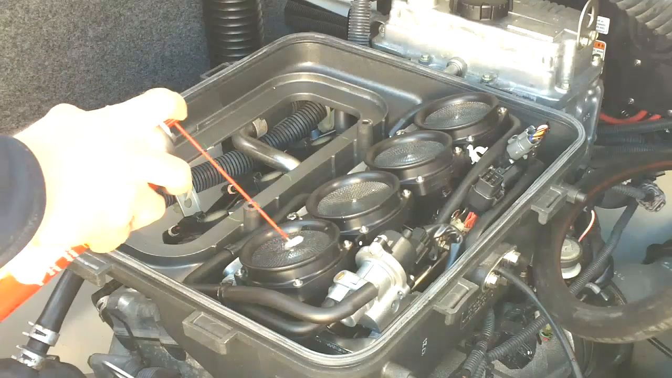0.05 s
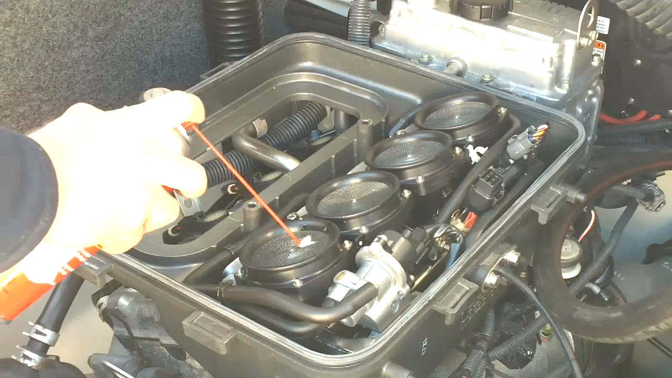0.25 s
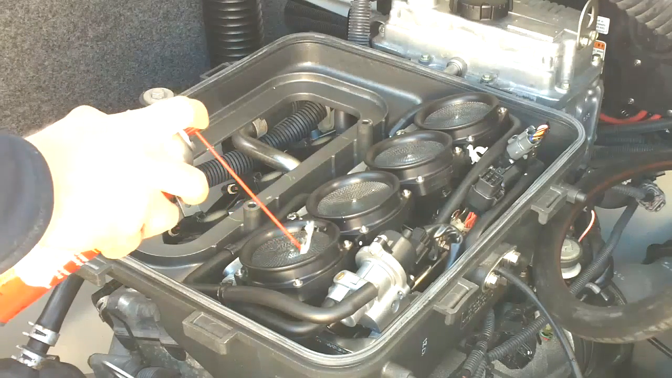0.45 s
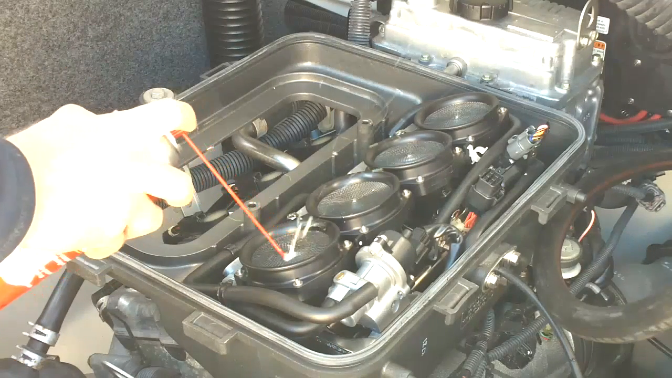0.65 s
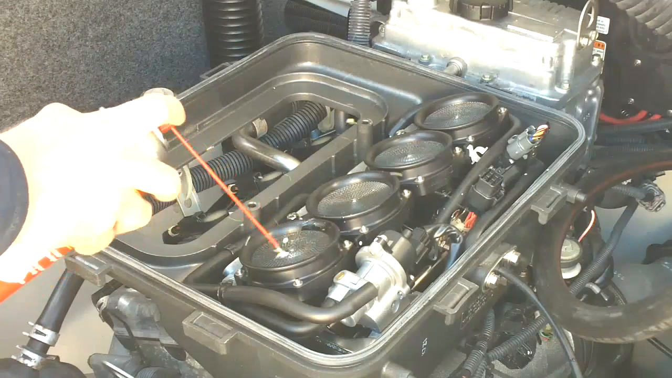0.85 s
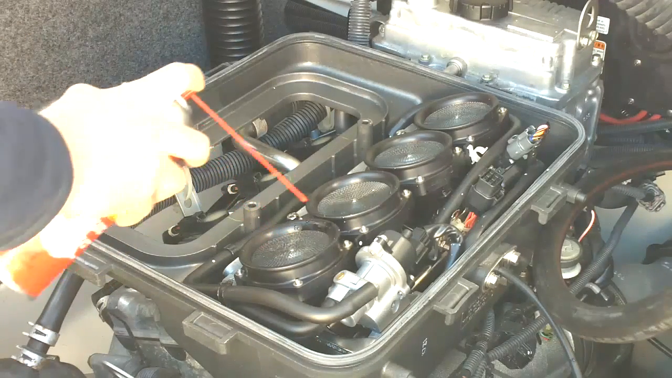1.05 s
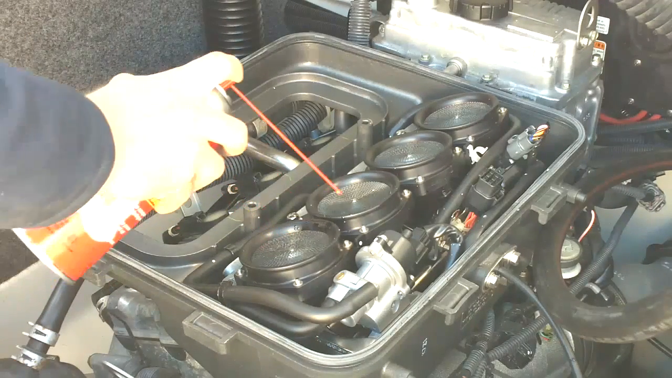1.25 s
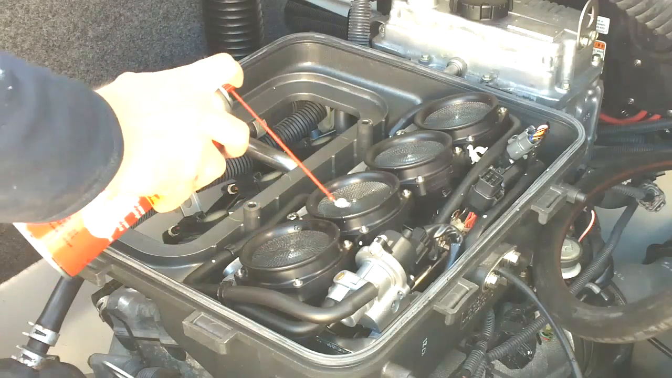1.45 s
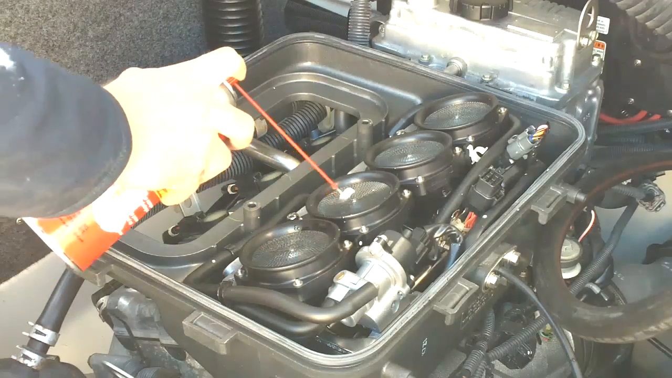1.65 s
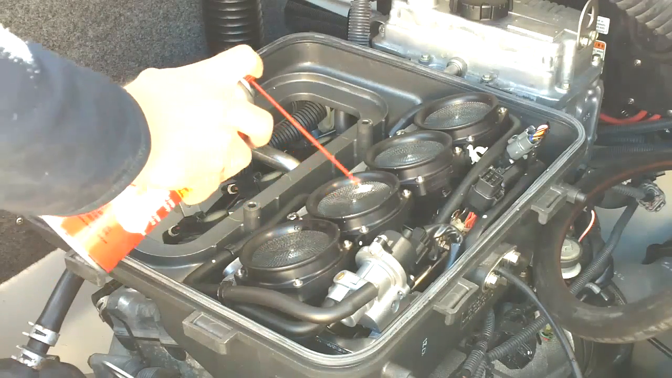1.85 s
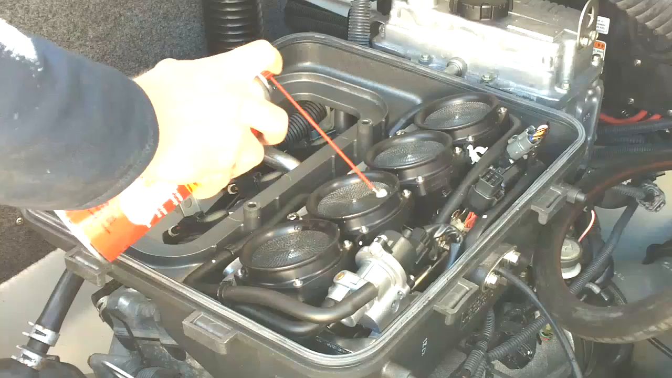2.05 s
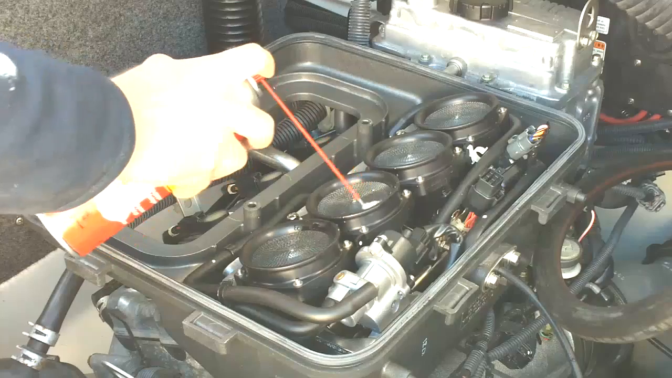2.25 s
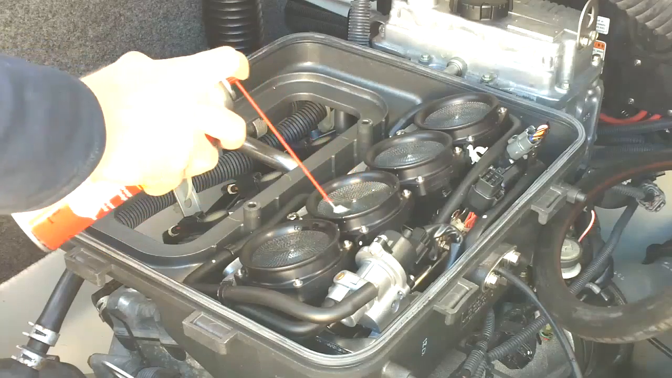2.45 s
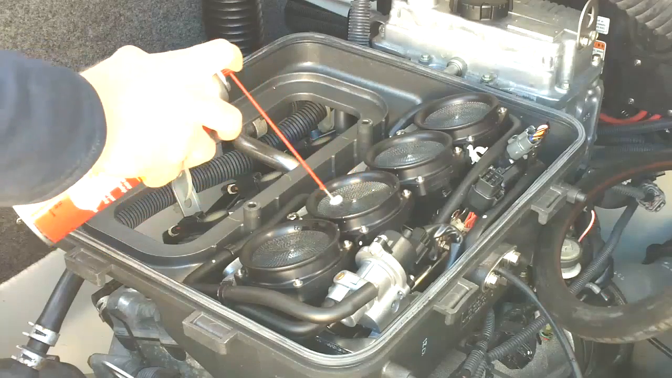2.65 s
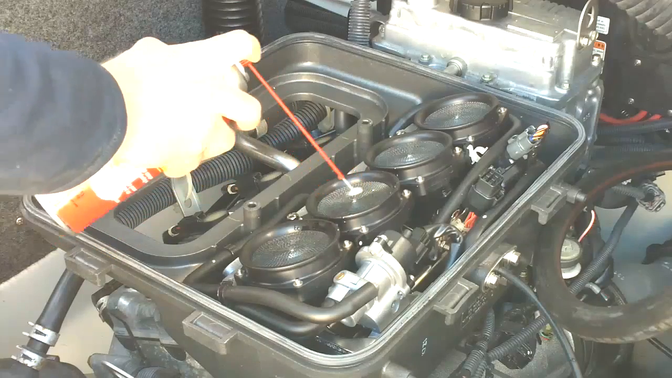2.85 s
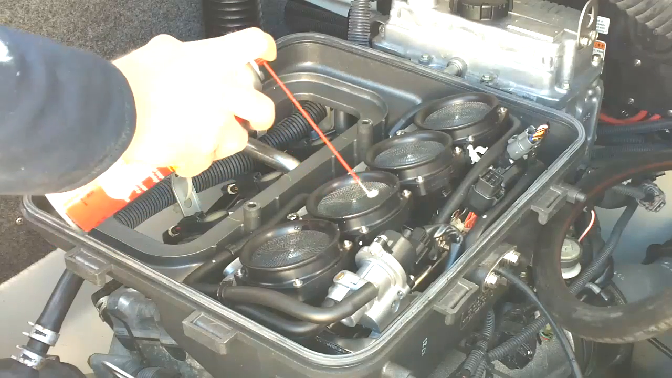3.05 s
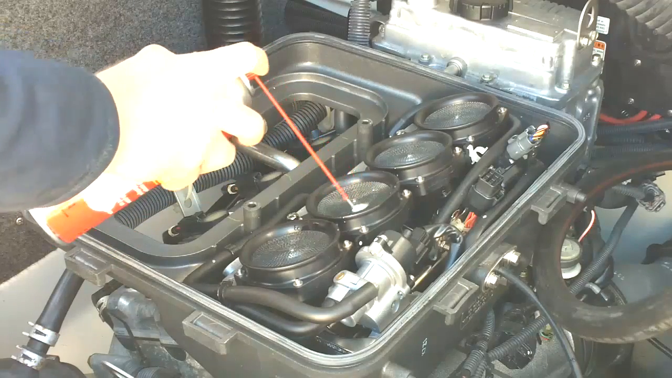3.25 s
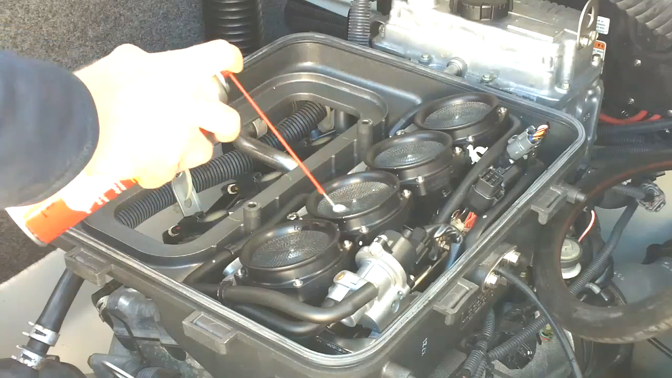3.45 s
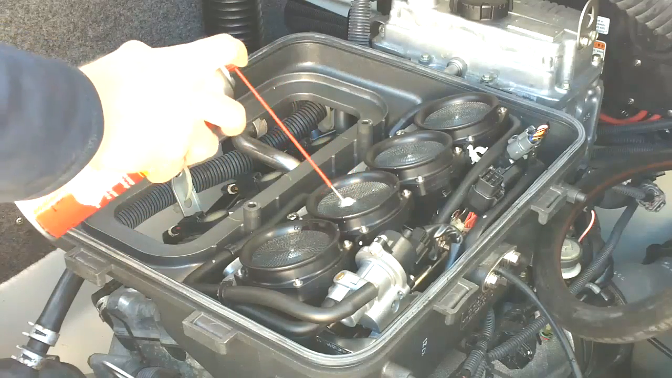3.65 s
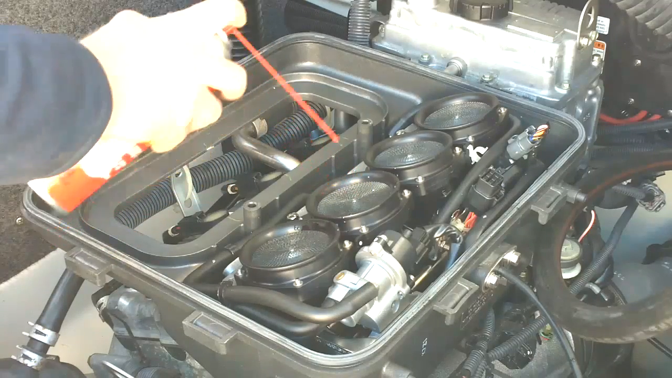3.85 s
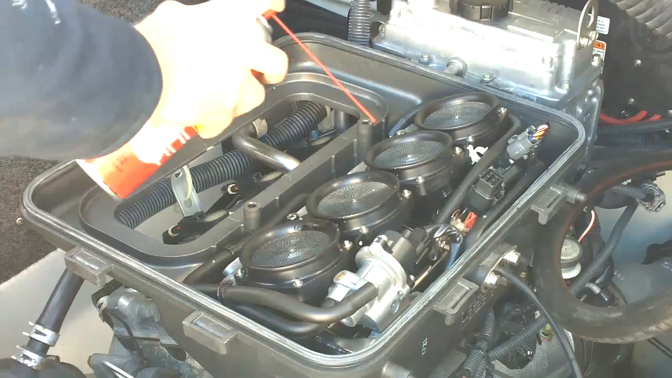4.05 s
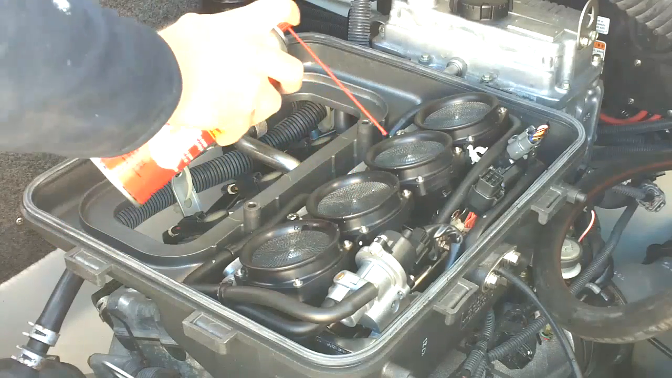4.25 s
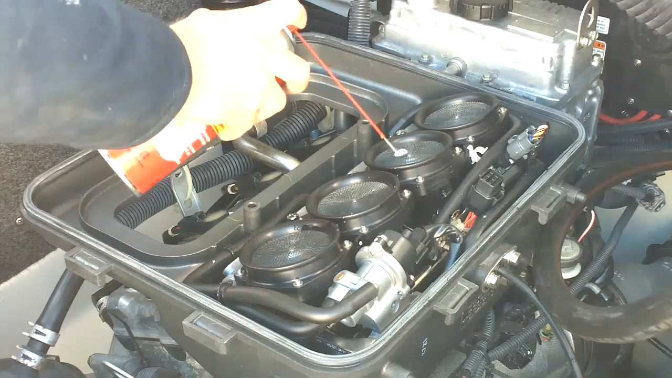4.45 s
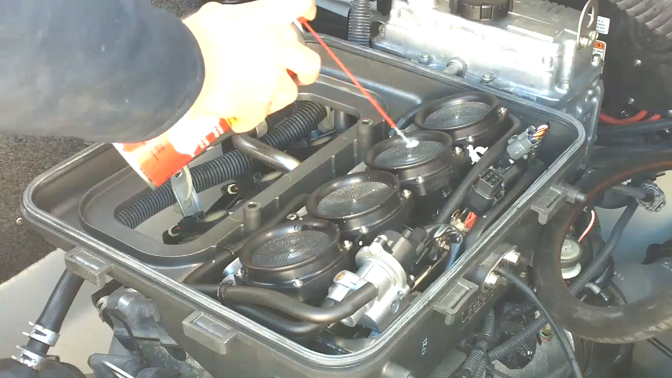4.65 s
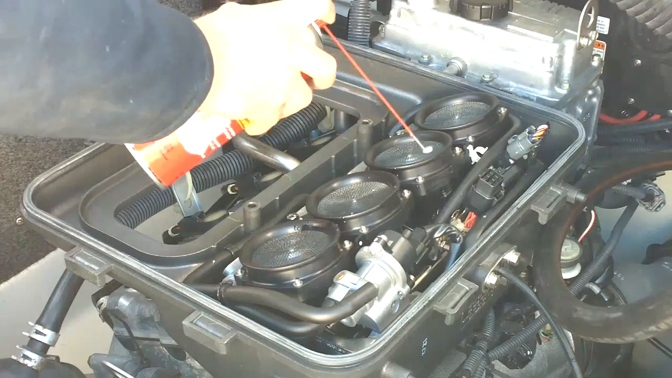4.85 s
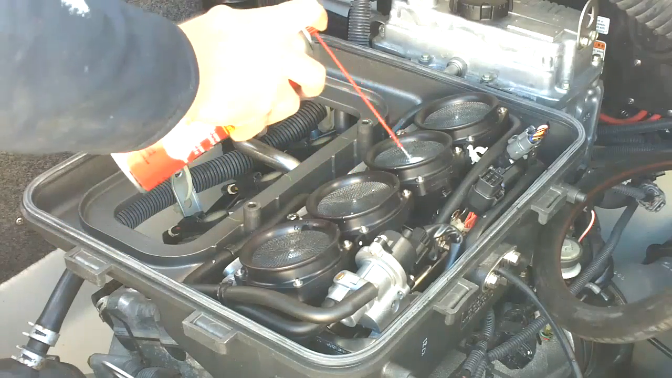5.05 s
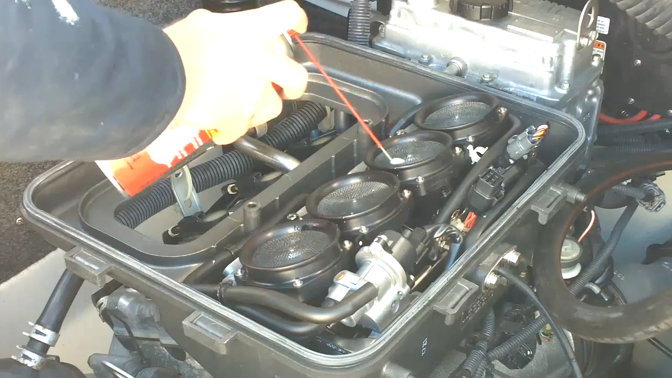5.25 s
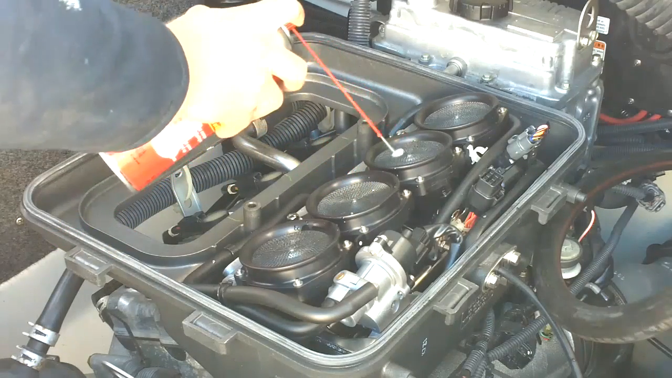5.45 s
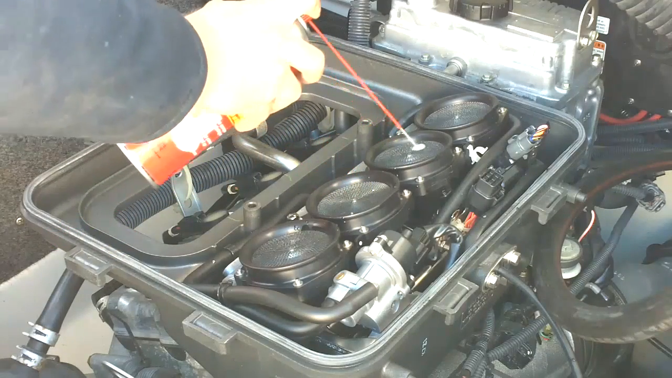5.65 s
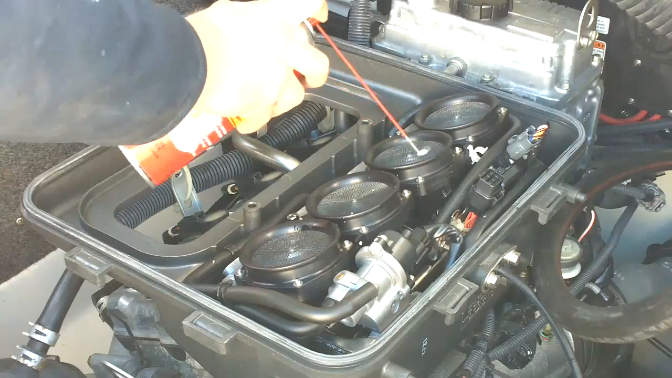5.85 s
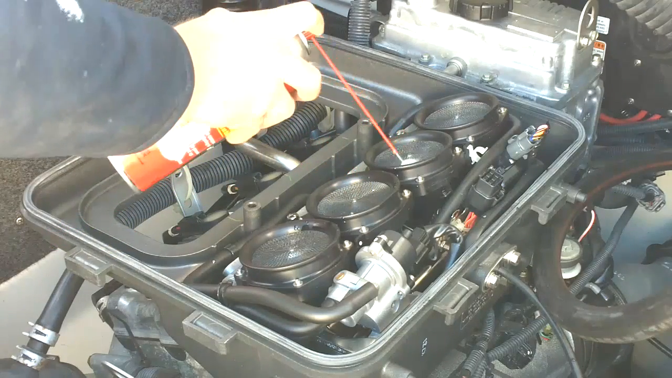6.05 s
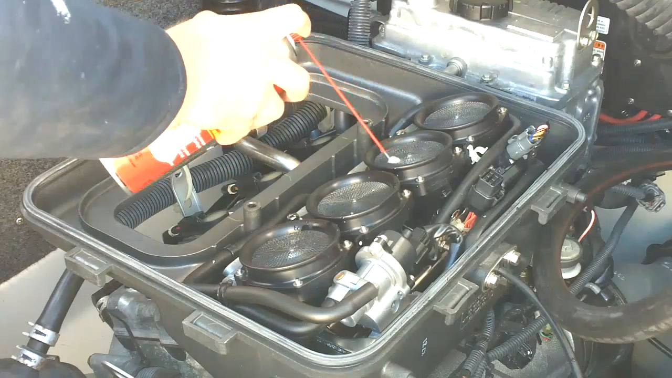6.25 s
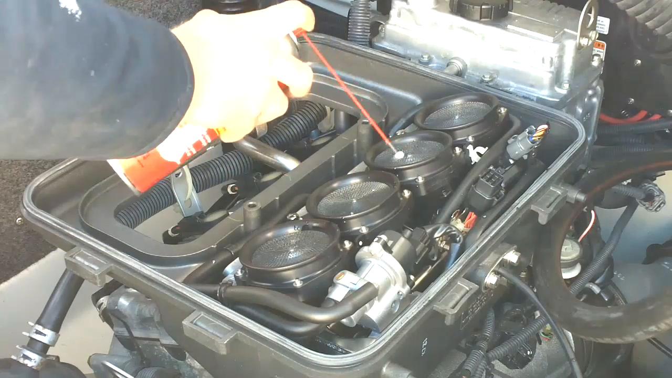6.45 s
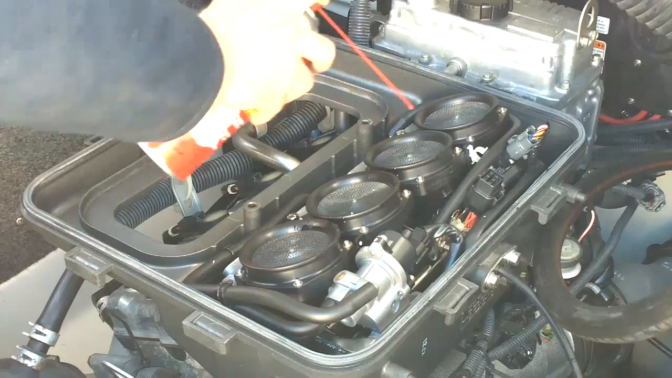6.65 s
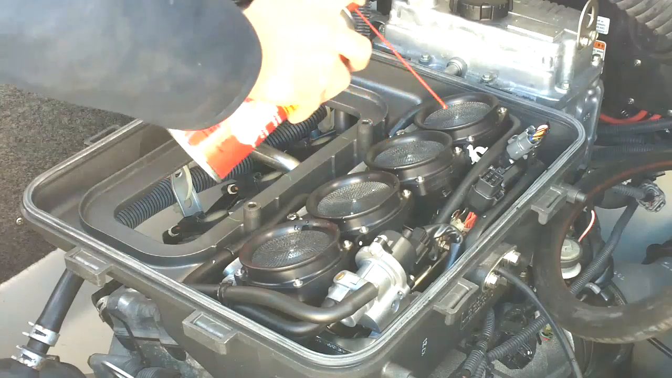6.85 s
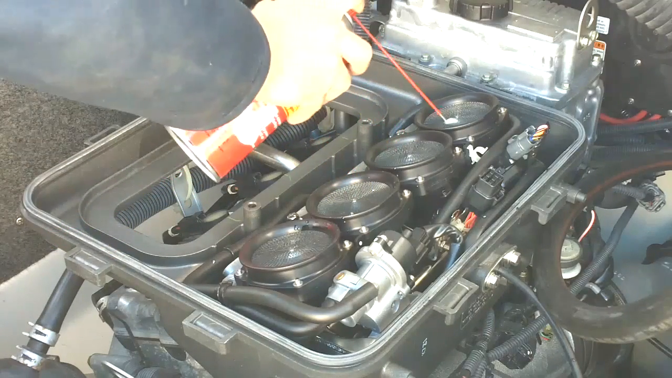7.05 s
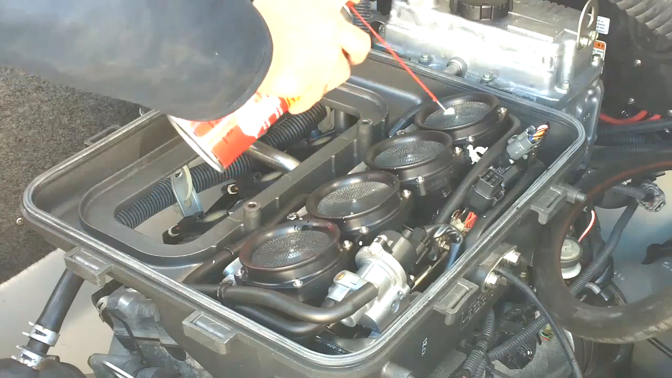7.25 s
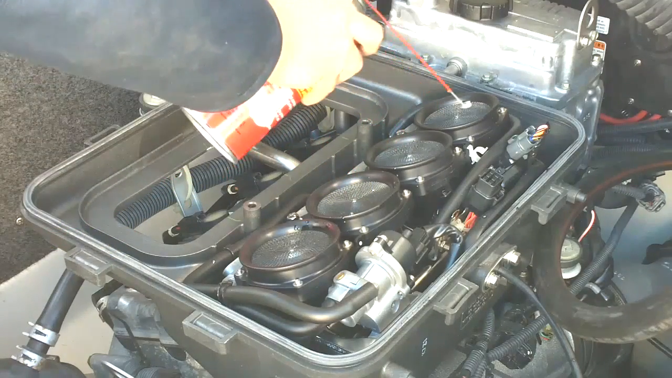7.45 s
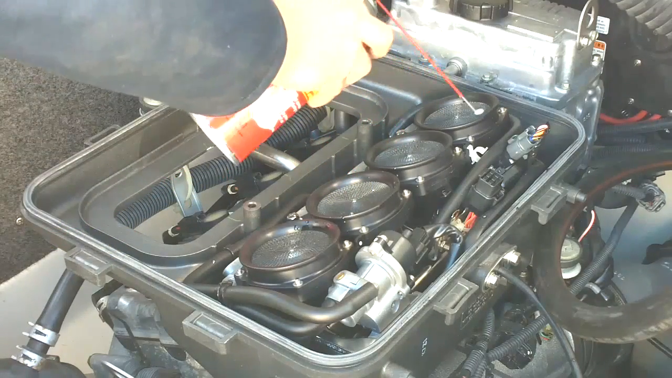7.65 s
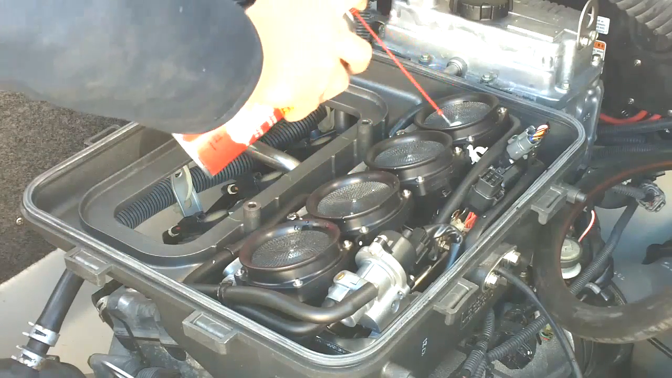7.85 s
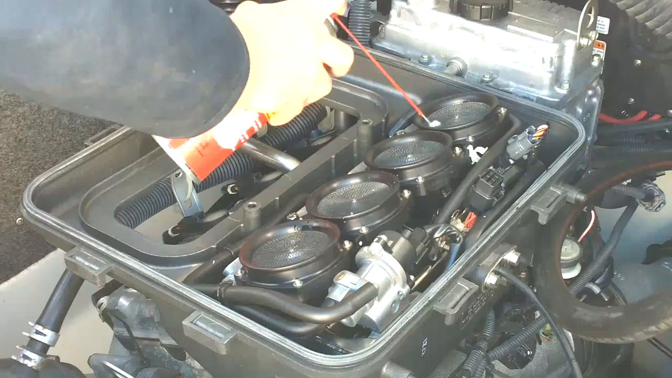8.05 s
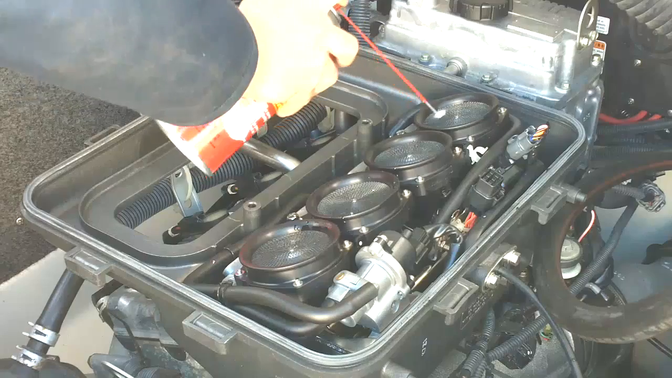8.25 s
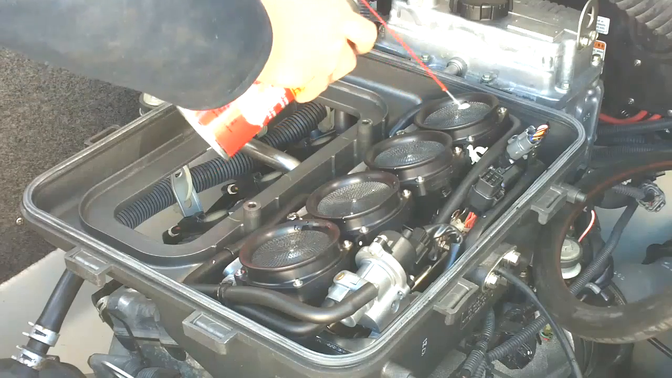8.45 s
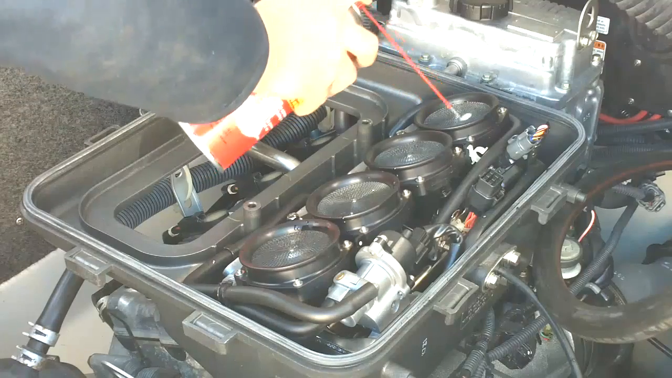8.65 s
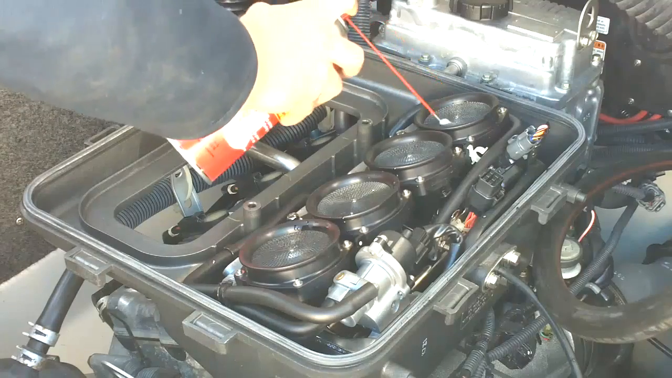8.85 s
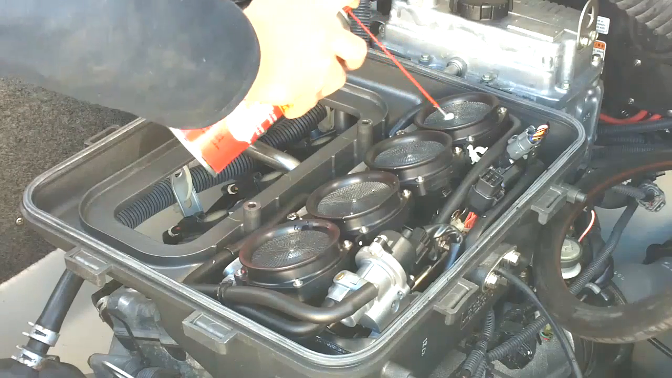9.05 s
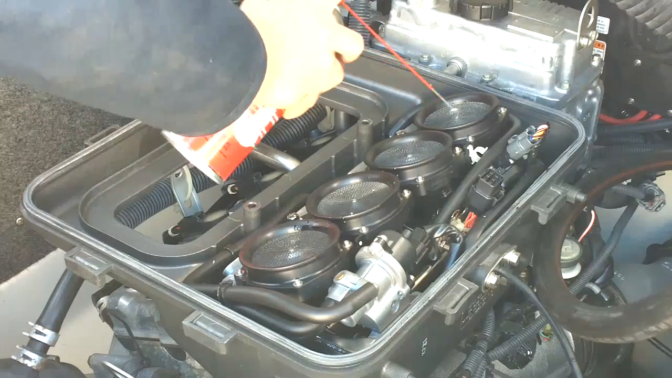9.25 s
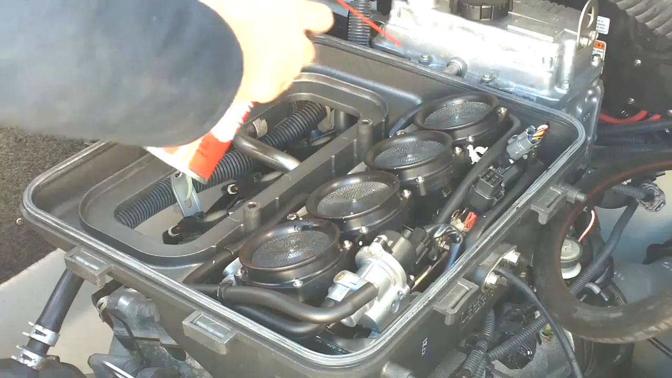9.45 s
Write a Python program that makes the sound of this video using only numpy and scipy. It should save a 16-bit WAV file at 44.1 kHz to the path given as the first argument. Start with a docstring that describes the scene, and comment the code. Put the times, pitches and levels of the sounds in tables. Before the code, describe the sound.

An aerosol can hisses oil through a straw in four steady bursts into engine intakes, shrill and hollow, with late wind thumps on the microphone.

```python
"""An aerosol can sprays oil through a straw into four intake throats of a boat engine, a burst each.
The first burst is under way at the start. In each, gas hisses first, then the oil stream makes the throat
ring with its own hollow colour and turns shrill where it grazes an edge; a thin mist lingers.
Light knocks sound over a low rumble from the second burst to the end. From just before the third burst
a draught, gusts and puffs of air buffet the microphone; the oil falters once late in the fourth."""
import sys
import numpy as np
from scipy import signal
from scipy.fft import rfft, irfft
from scipy.io import wavfile

SR = 44100
rng = np.random.default_rng(int(sys.argv[2]) if len(sys.argv) > 2 else 0)


def store_pcm(level_fs):
    """Save levels as 16-bit WAV."""
    pcm = np.round(np.clip(level_fs, -1, 1) * 32767).astype(np.int16)
    wavfile.write(sys.argv[1], SR, np.atleast_2d(pcm).T)


N = 418950
TIME = np.arange(N) / SR
FREQS = np.maximum(np.arange(N // 2 + 1) * SR / N, 1)

# background spectrum: (frequency [Hz], relative level per Hz [dB])
BACKGROUND_SPECTRUM = [(12, -1.5), (22, 1), (45, 0), (63, 5.5), (80, 1), (125, -1.5), (180, -12),
                       (300, -20), (600, -19.5), (1000, -28), (2000, -29.5), (3500, -34.5), (7000, -35),
                       (15000, -43)]
BACKGROUND_RMS_DB = -50  # before the tray

# light knocks: (start [s], peak [dB], centre [Hz], width of each filter pass [Hz], t60 of the rattle [s])
KNOCKS = [(1.797, -39, 513, 260, 0.091), (1.854, -41.5, 535, 140, 0.081), (4.082, -44, 3700, 1300, 0.09),
          (6.782, -44, 740, 1390, .07), (7.385, -38, 444, 800, 0.11), (9.355, -42, 750, 800, 0.05)]

# draught over the microphone, low rumble and small eddies: (frequency [Hz], relative level per Hz [dB])
RUMBLE_SPECTRUM = [(10, 1), (28, 6), (60, -5.5), (110, -12), (200, -33), (400, -71), (1000, -64), (4000, -100)]
EDDY_SPECTRUM = [(40, -1), (150, 1.5), (230, -2), (330, -17), (600, -37), (2000, -63)]
DRAUGHT_FROM_S, DRAUGHT_UNTIL_S, DRAUGHT_DB, DRAUGHT_SWING_DB = 4.05, 9.1, -47, 2.5
# gusts that swell out of the draught: (centre [s], Gaussian spread [s], rumble level [dB])
GUSTS = [(4.18, .065, -36), (4.43, .04, -35), (4.59, .04, -31), (4.77, .12, -31), (5.17, .05, -35),
         (6.03, .04, -40), (6.23, .06, -34.5), (6.91, .04, -35), (7.05, .035, -31), (7.85, .03, -25),
         (7.99, .06, -28), (8.342, .036, -22.5), (8.48, .05, -38), (8.71, .045, -32)]
# puffs on the microphone, before trims: (start [s], swing level [dB], eddies against swing [dB])
PUFFS = [(4.196, -23, -30), (4.515, -31.5, 0), (4.579, -29, -7.5), (4.683, -22.5, -30), (4.756, -20.5, -13),
         (4.889, -21, -30), (5.141, -26, -25), (6.009, -27.5, -32), (6.207, -21, -35),
         (6.266, -24.5, -10.5), (6.926, -25, -17), (7.053, -23, -22), (7.852, -16, -23),
         (7.939, -13.5, -8.5), (7.993, -15.5, -13), (8.305, -13, -12.5), (8.351, -10, -17.5),
         (8.437, -27, -12), (8.685, -38, -1), (8.766, -26, -28)]

# valve presses, one per throat: (press [s], release [s], hiss level [dB], wetted throat ring level [dB],
# width of the hollow note [Hz])
BURSTS = [(-1.2, 0.856, -38, -41, 85), (1.333, 3.738, -38.6, -36.6, 175), (4.259, 6.47, -38.5, -38.6, 215),
          (6.933, 9.26, -38.1, -39, 190)]
# gas comes first and dies away slowly; oil comes late and stops quickly
GAS_ATTACK_S, GAS_HANG_S, GAS_FALL_DB_PER_S = 0.04, 0.02, 160
OIL_DELAY_S, OIL_ATTACK_S, OIL_FALL_DB_PER_S = 0.054, 0.022, 460
# spitting mist runs ahead of the oil and lingers after it
MIST_ATTACK_S, MIST_HANG_S, MIST_FALL_DB_PER_S = 0.09, 0.05, 100
MIST_SPIT_DB, MIST_SPLASH_DB, MIST_RING_SHARE = 1.8, -52.5, 0.08
# one dip of the oil stream; the spread is Gaussian
FALTER_S, FALTER_SPREAD_S, FALTER_DB = 8.72, 0.03, -8
# wetting a throat lowers its edge pitch and builds up its ring
SETTLE_S, EDGE_STARTS_HIGHER, DRY_RING_DB = 0.68, 0.115, -7.5
EDGE_HZ = 3170  # once wetted
# trims, each against its level curve
EDGE_DB, WHISTLE_DB, SPLASH_DB, HOLLOW_DB = -3.6, -9, 2.8, -1.7

# throat resonances: (frequency [Hz], width [Hz], relative level [dB])
THROAT_1 = [(1475, 62, -9.5), (1943, 91, -3), (2238, 23, 1.5), (2460, 320, -12), (2780, 75, -5.5)]
THROAT_2 = [(1640, 170, -18), (2095, 62, -6.5), (2216, 70, -4), (2625, 58, -7)]
THROAT_3 = [(1380, 36, -15), (1760, 23, -11), (2124, 170, -9), (2567, 164, -8.5), (2854, 26, -5)]
THROAT_4 = [(1591, 290, -16.5), (1880, 41, -11.5), (2280, 79, -2.5), (2590, 210, -9.5), (2770, 20, 0)]
# broad resonances of a dry throat: (frequency [Hz], width [Hz], relative level [dB])
DRY_THROAT = [(1400, 450, -9), (2660, 330, 0)]
DRY_THROAT_DB = -42
# hollow note, shifting with the aim of the straw: (time [s], level before trim [dB], pitch [Hz])
HOLLOW_1 = [(0.0, -52, 879), (0.198, -47, 860), (0.84, -44, 856)]
HOLLOW_2 = [(1.42, -51, 1030), (1.43, -49, 1050), (2.15, -53, 989), (3.0, -49, 887), (3.28, -54, 949),
            (3.72, -46, 863)]
HOLLOW_3 = [(4.36, -48, 1030), (4.71, -49, 948), (5.67, -49, 895), (5.96, -47, 838), (6.03, -55, 961),
            (6.46, -53, 898)]
HOLLOW_4 = [(7.02, -47, 1110), (7.76, -51, 931), (8.13, -49, 1040), (8.56, -51, 853), (8.69, -53, 1030),
            (9.24, -52, 861)]
# jet grazing edges as the straw moves, before trims: (time [s], shrill level [dB], splash level [dB])
GRAZE_1 = [(0.0, -42, -44), (0.02, -36, -41), (0.306, -48, -47), (0.38, -45, -50), (0.84, -47, -47)]
GRAZE_2 = [(1.41, -42, -46), (1.54, -41, -46), (1.71, -35, -41), (1.95, -39, -43), (2.5, -35, -43),
           (2.61, -36, -38), (2.94, -32, -41), (2.97, -37, -43), (3.6, -37, -44), (3.72, -43, -43)]
GRAZE_3 = [(4.35, -41, -47), (4.61, -29, -33), (4.76, -36, -44), (4.85, -40, -42), (5.07, -34, -41),
           (5.63, -35, -40), (5.72, -38, -46), (5.91, -43, -43), (6.02, -34, -43), (6.46, -41, -45)]
GRAZE_4 = [(7.01, -38, -43), (7.19, -36, -43), (7.37, -29, -32), (7.44, -32, -42), (7.68, -39, -45),
           (8.26, -32, -38), (8.33, -32, -42), (8.69, -45, -45), (8.97, -35, -42), (9.17, -42, -48),
           (9.26, -35, -43)]
# bare jet, and jet splashing on an edge: (frequency [Hz], relative level per Hz [dB])
NOZZLE_SPECTRUM = [(200, -33), (600, -14), (1300, -8), (2000, -9.5), (3000, -7), (5400, -5), (6500, 5),
                   (7400, 0), (9000, 1), (10500, 2), (11800, 1), (13500, -1.5), (15300, -5.5)]
SPLASH_SPECTRUM = [(1200, -33), (2800, -10.5), (3800, -0.5), (4500, 5), (4900, 1.5), (5200, -1), (6000, -3),
                   (6800, -8.5), (9000, -24), (15000, -32)]

# standing waves in the engine tray: (frequency [Hz], width [Hz], gain [dB])
TRAY_MODES = [(406, 10, -1.5), (560, 22, 4.5), (712, 27, -7.5), (758, 15, 8), (853, 18, 5.5),
              (1027, 35, -8.5), (1100, 59, 5.5), (1304, 20, -1), (1596, 33, -5), (1810, 44, -5),
              (2280, 68, -2), (3166, 61, 6), (3402, 36, 5.5), (3760, 70, 6), (4820, 91, 4),
              (5170, 140, -3.5), (6000, 110, 2)]
# microphone notches: (frequency [Hz], width [Hz])
NOTCHES = [(4210, 670), (7860, 2500), (8800, 1400), (12600, 2640)]
CUTOFF_HZ = 15330


def from_db(db):
    """Decibels to gain."""
    return 10 ** (np.asarray(db) / 20)


def rms_one(x):
    """Scale to an rms of 1."""
    return x / np.sqrt(np.mean(x ** 2) + 1e-20)


def in_time(rows):
    """Each column of a curve at every sample."""
    time_s, *columns = np.transpose(rows)
    return [np.interp(TIME, time_s, column) for column in columns]


def bump(centre_s, spread_s):
    """Gaussian swell in time, peak 1."""
    return np.exp(-0.5 * ((TIME - centre_s) / spread_s) ** 2)


def envelope(start_s, attack_s, stop_s, fall_db_per_s):
    """Straight rise, hold, steady fall in dB."""
    rise = np.clip((TIME - start_s) / attack_s, 0, 1)
    return rise * from_db(-fall_db_per_s * np.clip(TIME - stop_s, 0, 1))


def drift(rate_hz):
    """Slow random curve, rms 1: two-pole low-passed noise, computed every 40 samples."""
    step, settle = 40, 2000
    pole = np.exp(-2 * np.pi * rate_hz * step / SR)
    white = rng.standard_normal(N // step + settle + 2)
    slow = signal.lfilter([1], [1, -2 * pole, pole * pole], white)[settle:]
    return np.interp(np.arange(N) / step, np.arange(len(slow)), rms_one(slow))


def slope(points):
    """Gain at every frequency, interpolated in dB over log frequency."""
    hz, db = np.transpose(points)
    return from_db(np.interp(np.log(FREQS), np.log(hz), db))


def resonances(modes):
    """Gain at every frequency of resonances that add in power."""
    power = 0
    for hz, width_hz, db in modes:
        detune = (FREQS ** 2 - hz ** 2) / (FREQS * width_hz)
        power = power + from_db(db) ** 2 / (1 + detune ** 2)
    return np.sqrt(power)


def noise(gain):
    """Gaussian noise coloured by a gain curve, rms 1."""
    return rms_one(irfft(rfft(rng.standard_normal(N)) * gain, N))


def gliding_resonance(hz, width_hz, order):
    """Turbulence in a moving resonance: low-passed noise pair on a gliding carrier, rms 1."""
    lowpass = signal.butter(order, width_hz / 2, fs=SR, output="sos")
    wobble = signal.sosfilt(lowpass, rng.standard_normal((2, N)))
    phase = 2 * np.pi * np.cumsum(hz) / SR
    return rms_one(wobble[0] * np.cos(phase) + wobble[1] * np.sin(phase))


def add(out, start_s, sound):
    """Mix in a short sound, cut at the end."""
    start = int(start_s * SR)
    out[start:start + len(sound)] += sound[:N - start]


def background():
    """Steady low rumble: noise of a fixed spectrum."""
    return from_db(BACKGROUND_RMS_DB) * noise(slope(BACKGROUND_SPECTRUM))


def knocks():
    """Light contacts: a decaying noise rattle through one resonance, passed twice."""
    out, t = np.zeros(N), TIME[:SR // 4]
    for start_s, peak_db, hz, width_hz, t60_s in KNOCKS:
        rattle = rng.standard_normal(len(t)) * from_db(-60 * t / t60_s)
        body = signal.iirpeak(hz, hz / width_hz, fs=SR)
        knock = signal.lfilter(*body, signal.lfilter(*body, rattle))
        add(out, start_s, from_db(peak_db) * knock / np.abs(knock).max())
    return out


def draught():
    """Lumpy rumble of air drifting over the microphone; stronger flow has a larger share of small eddies."""
    blowing = envelope(DRAUGHT_FROM_S, attack_s=0.08, stop_s=DRAUGHT_UNTIL_S, fall_db_per_s=60)
    light = blowing * from_db(DRAUGHT_DB + DRAUGHT_SWING_DB * drift(4))
    gusts = [from_db(db) * bump(centre_s, spread_s) for centre_s, spread_s, db in GUSTS]
    strength = np.max([light, *gusts], axis=0)
    rumble = noise(slope(RUMBLE_SPECTRUM))
    eddies = noise(slope(EDDY_SPECTRUM))
    eddy_share = np.minimum(np.sqrt(strength / from_db(-29.5)), 1)
    flicker_db = 3 * drift(14)
    return strength * (rumble + eddy_share * from_db(flicker_db - 11.5) * eddies)


def puffs(swing_s, eddy_s, centre_s, eddy_hz):
    """Each puff is one swing of pressure with a flurry of small eddies on it."""
    out = np.zeros(N)
    t = TIME[:SR // 10] - centre_s
    eddies = noise(1 / (1 + (FREQS / eddy_hz) ** 3.4) / (1 + (110 / FREQS) ** 2))
    rise = np.minimum((t + centre_s) / centre_s, 1)
    swing = -t / swing_s * np.exp(-0.5 * (t / swing_s) ** 2)
    for start_s, swing_db, eddy_db in PUFFS:
        flurry = eddies[int(start_s * SR):][:len(t)] * np.exp(-np.abs(t) / eddy_s)
        pressure = from_db(swing_db + 1.5) * swing
        pressure = pressure + from_db(swing_db + eddy_db - 0.5) * flurry
        add(out, start_s, rise * pressure)
    return out


def patchy_treble(x, depth_db, rate_hz, count):
    """Patchy treble: overlapping bands swell and sink independently."""
    spectrum = rfft(x)
    # outer bands also take everything below 2.4 and above 15 kHz
    place = np.interp(np.log(FREQS), np.log([2400, 15000]), [0, count - 1])
    out = np.zeros(N)
    for k in range(count):
        band = irfft(spectrum * np.maximum(1 - np.abs(place - k), 0), N)
        out += band * from_db(depth_db * drift(rate_hz))
    return out


def airbox(x, echo_db, longest_s, sway_s, count):
    """Short echoes off tray and engine ripple the spectrum; their paths sway with the hand."""
    out = x.copy()
    for k, lag_s in enumerate(rng.uniform(longest_s / 5, longest_s, count)):
        echo = np.interp(TIME - lag_s - sway_s * drift(0.41), TIME, x)
        out += (-1) ** k * from_db(echo_db) * echo
    return out


def spray():
    """Four bursts: the gas jet hisses; the oil stream sets the throat and its edges sounding."""
    hiss, edge, splash, throat, dryness = np.zeros((5, N))
    falter = from_db(FALTER_DB * bump(FALTER_S, FALTER_SPREAD_S))
    throat_band = 1 / np.sqrt((1 + (1200 / FREQS) ** 8) * (1 + (FREQS / 3800) ** 8))
    dry_ring = from_db(DRY_THROAT_DB) * noise(resonances(DRY_THROAT) * throat_band)
    spitting = from_db(MIST_SPIT_DB * drift(14))
    throats = [THROAT_1, THROAT_2, THROAT_3, THROAT_4]
    hollows = [HOLLOW_1, HOLLOW_2, HOLLOW_3, HOLLOW_4]
    grazes = [GRAZE_1, GRAZE_2, GRAZE_3, GRAZE_4]
    for burst, modes, note, graze in zip(BURSTS, throats, hollows, grazes):
        press_s, release_s, hiss_db, ring_db, width_hz = burst
        gas = envelope(press_s, GAS_ATTACK_S, release_s + GAS_HANG_S, GAS_FALL_DB_PER_S)
        oil = envelope(press_s + OIL_DELAY_S, OIL_ATTACK_S, release_s, OIL_FALL_DB_PER_S)
        mist = spitting * envelope(press_s, MIST_ATTACK_S, release_s + MIST_HANG_S, MIST_FALL_DB_PER_S)
        flow = np.maximum(oil, MIST_RING_SHARE * mist) * falter
        dry_share = (TIME >= press_s) * np.exp(-((TIME - press_s) / SETTLE_S) ** 2)
        edge_db, splash_db = in_time(graze)
        hollow_db, hollow_hz = in_time(note)

        dryness += dry_share
        hiss += gas * from_db(hiss_db)
        edge += flow * from_db(edge_db)
        splash += np.maximum(oil * from_db(splash_db), mist * from_db(MIST_SPLASH_DB))
        ring = from_db(ring_db + DRY_RING_DB * dry_share) * noise(resonances(modes) * throat_band)
        hollow = from_db(hollow_db + HOLLOW_DB) * gliding_resonance(hollow_hz, width_hz, order=2)
        throat += flow * (ring + dry_share * dry_ring + hollow)

    jet = hiss * noise(slope(NOZZLE_SPECTRUM))
    # a grazed edge gives a wide shrill band, a narrower whistle and a bright splash
    edge_hz = EDGE_HZ * (1 + EDGE_STARTS_HIGHER * dryness)
    whistle_hz = edge_hz + 40 * drift(3)
    shrill = edge * from_db(EDGE_DB) * gliding_resonance(edge_hz, width_hz=674, order=2)
    shrill += edge * from_db(WHISTLE_DB) * gliding_resonance(whistle_hz, width_hz=127, order=2)
    shrill += splash * from_db(SPLASH_DB) * noise(slope(SPLASH_SPECTRUM))

    # oil and gas leave the straw unevenly
    sputter_db = 0.59 * drift(79) + 0.75 * drift(7.3)
    open_air = jet * from_db(sputter_db) + shrill * from_db(1.36 * sputter_db)
    open_air = patchy_treble(open_air, depth_db=1.77, rate_hz=1.4, count=44)
    open_air = airbox(open_air, echo_db=-15.5, longest_s=0.01, sway_s=0.00006, count=8)
    return throat * from_db(sputter_db) + open_air


def tray(x):
    """Standing waves around the engine lift or cancel fixed narrow bands."""
    gain_db = 0
    for hz, width_hz, db in TRAY_MODES:
        gain_db = gain_db + db / (1 + (2 * (FREQS - hz) / width_hz) ** 2)
    return irfft(rfft(x) * from_db(gain_db), N)


def scene():
    """Background and spray through the tray, plus knocks and air on the microphone."""
    wind = draught() + puffs(swing_s=0.0035, eddy_s=0.013, centre_s=0.0092, eddy_hz=250)
    return (tray(background() + spray()) + wind + knocks())[None]


def record(dry):
    """Microphone: deep treble notches and a steep top cut."""
    for hz, width_hz in NOTCHES:
        dry = signal.lfilter(*signal.iirnotch(hz, hz / width_hz, fs=SR), dry)
    top_cut = signal.ellip(14, 0.1, 80, CUTOFF_HZ, fs=SR, output="sos")
    return signal.sosfilt(top_cut, dry)


dry = scene()
out = record(dry)
store_pcm(out)
```